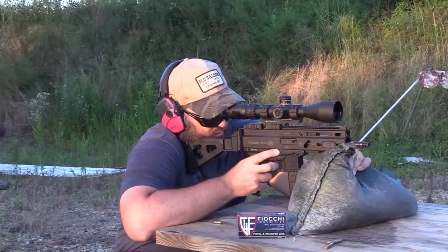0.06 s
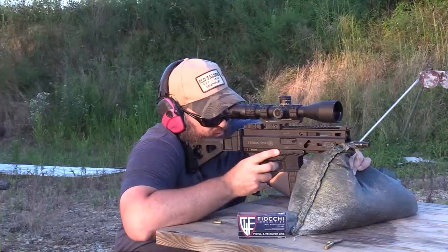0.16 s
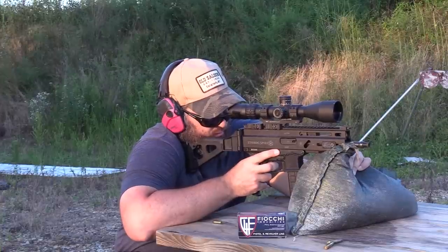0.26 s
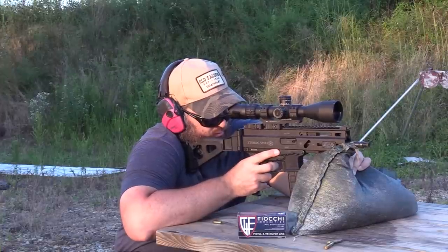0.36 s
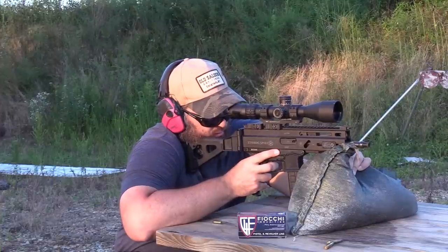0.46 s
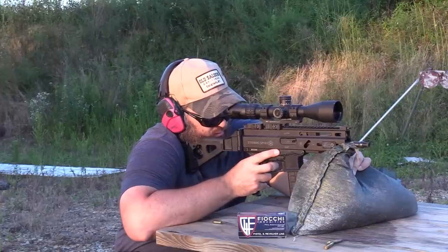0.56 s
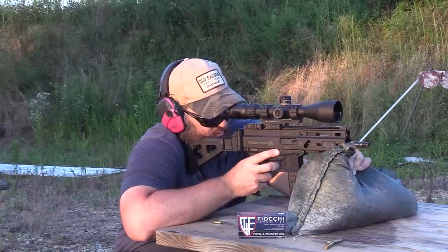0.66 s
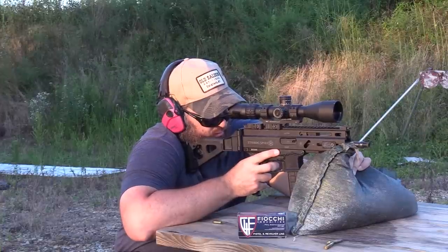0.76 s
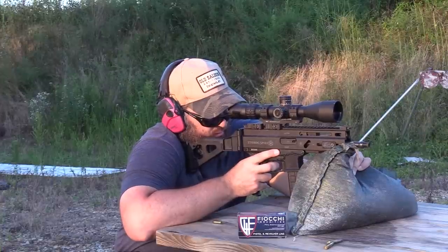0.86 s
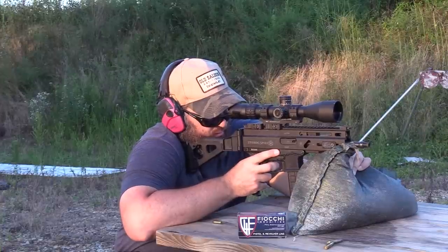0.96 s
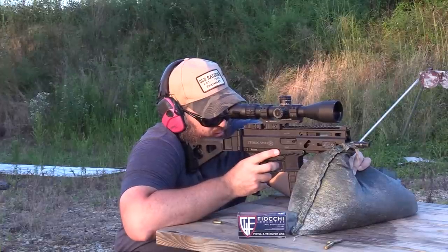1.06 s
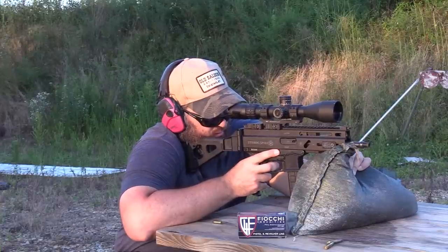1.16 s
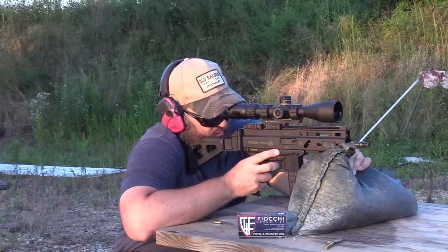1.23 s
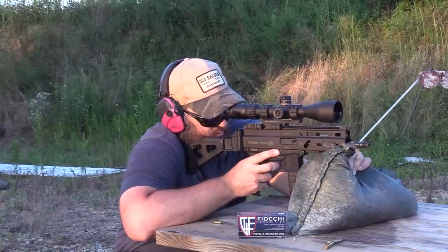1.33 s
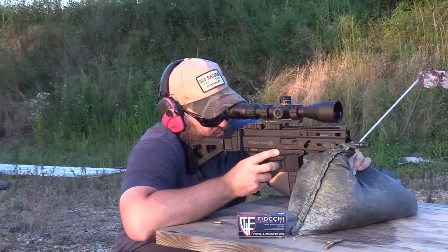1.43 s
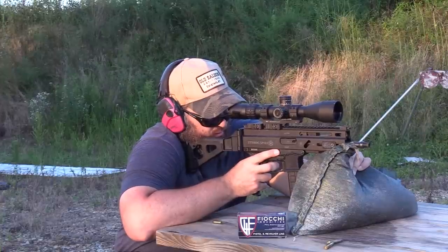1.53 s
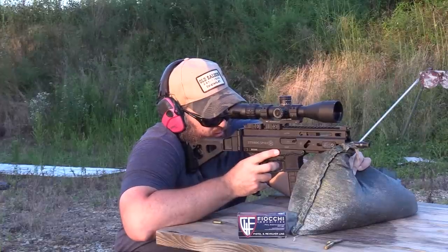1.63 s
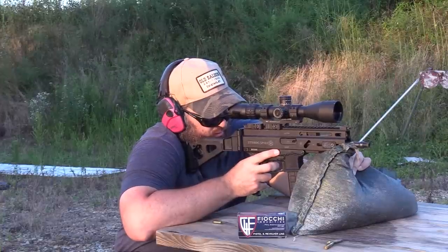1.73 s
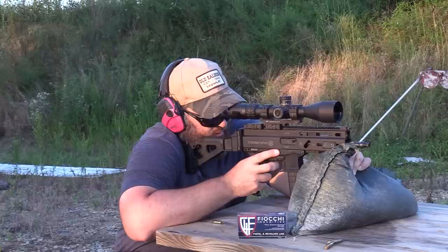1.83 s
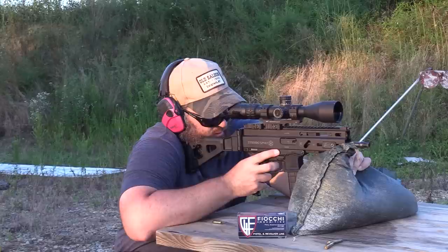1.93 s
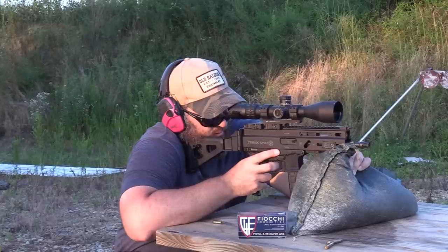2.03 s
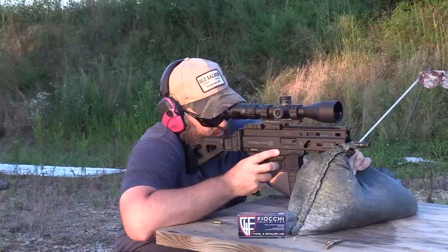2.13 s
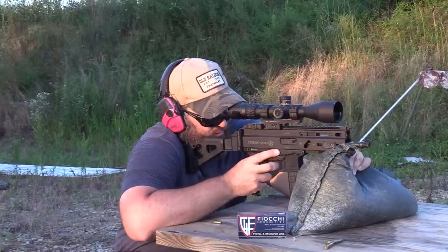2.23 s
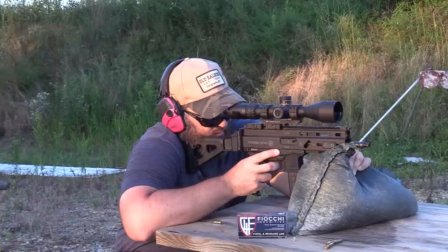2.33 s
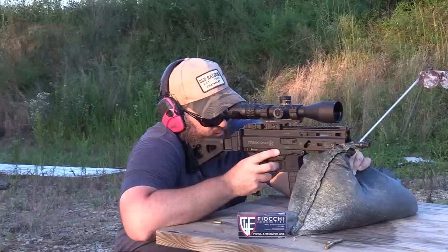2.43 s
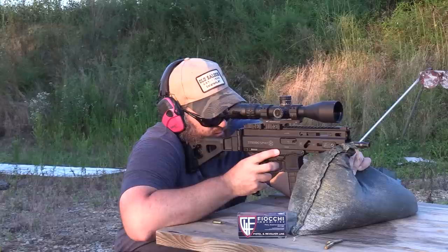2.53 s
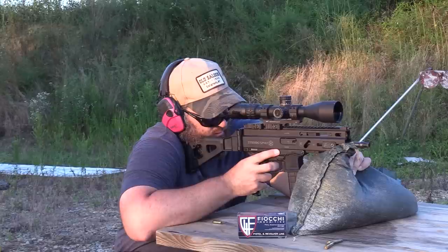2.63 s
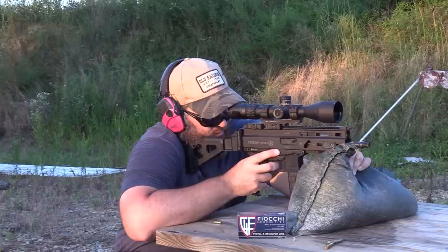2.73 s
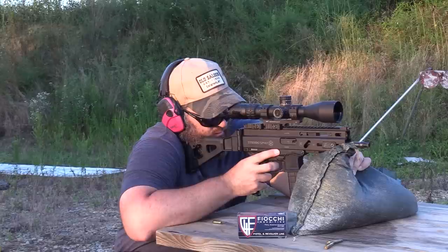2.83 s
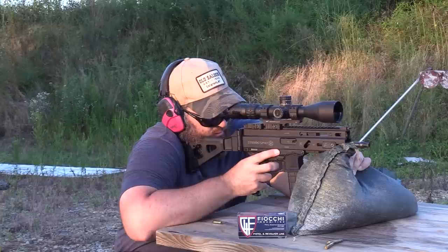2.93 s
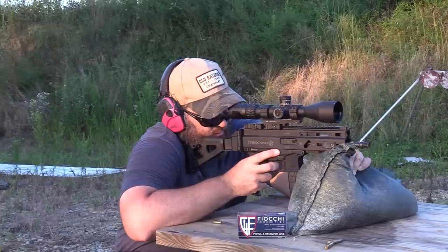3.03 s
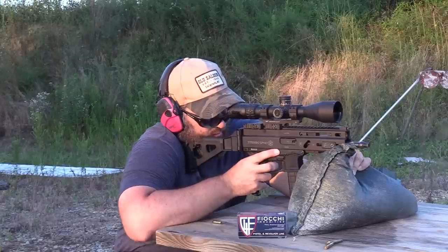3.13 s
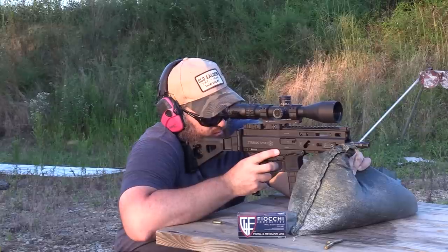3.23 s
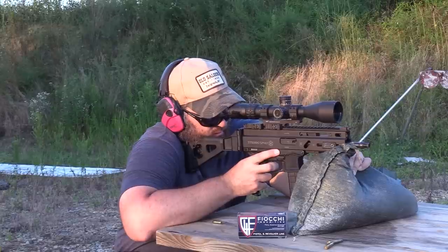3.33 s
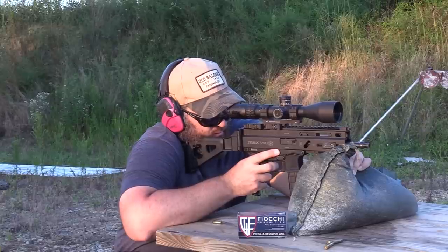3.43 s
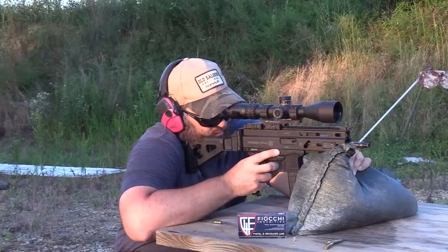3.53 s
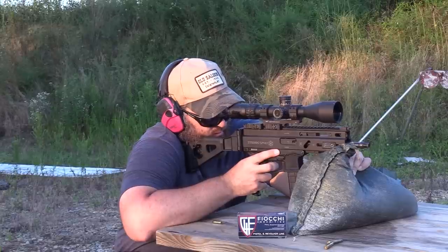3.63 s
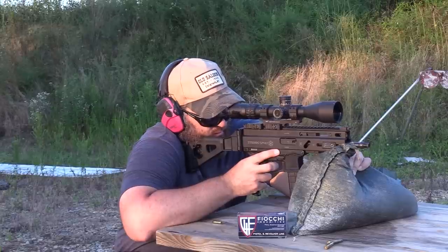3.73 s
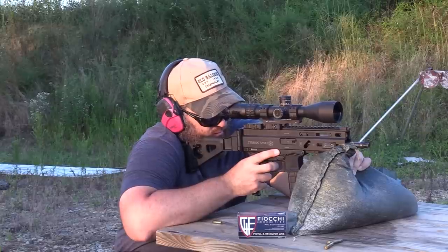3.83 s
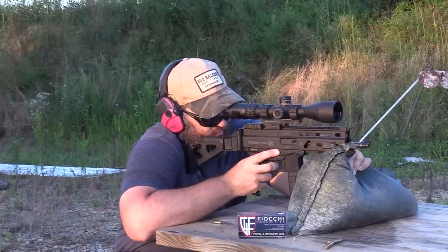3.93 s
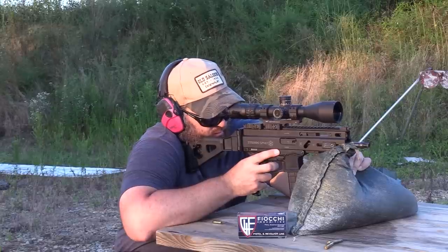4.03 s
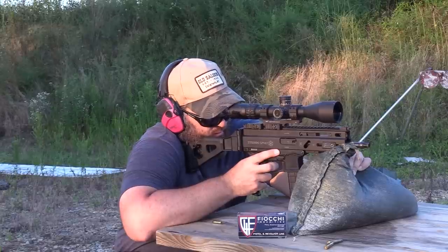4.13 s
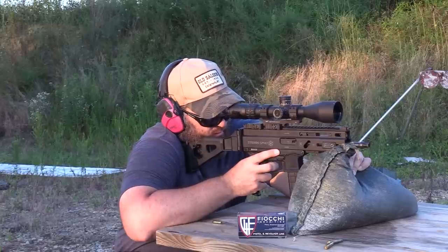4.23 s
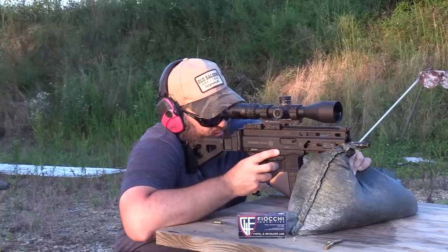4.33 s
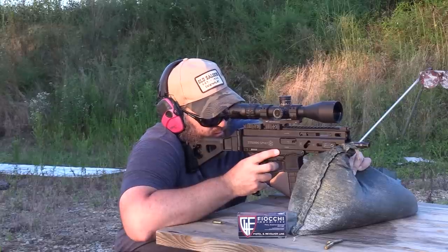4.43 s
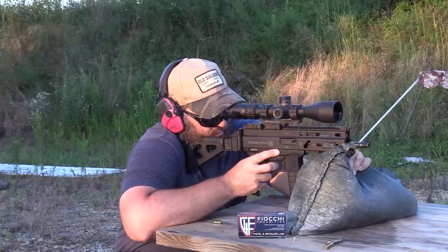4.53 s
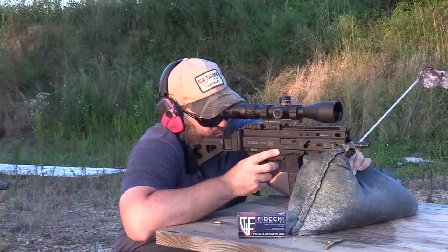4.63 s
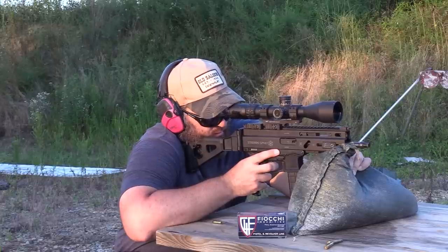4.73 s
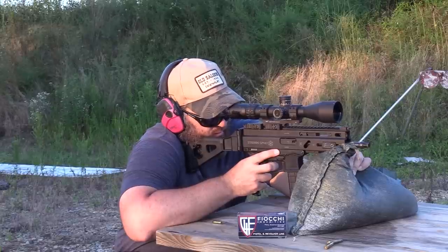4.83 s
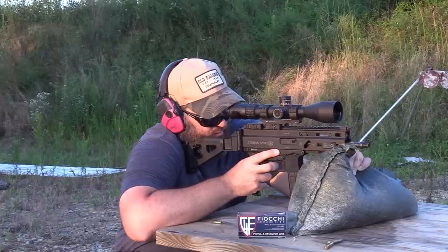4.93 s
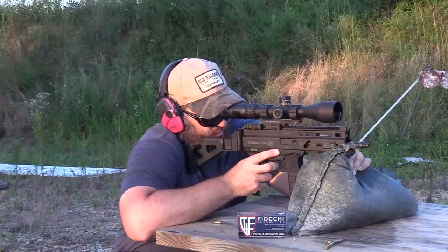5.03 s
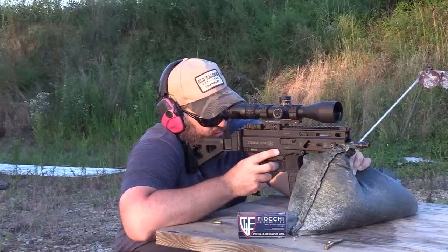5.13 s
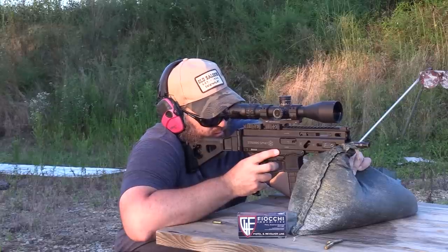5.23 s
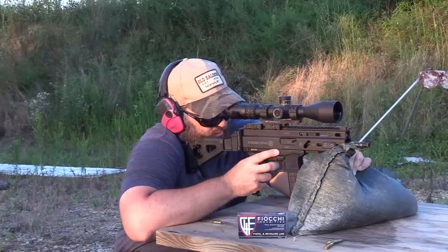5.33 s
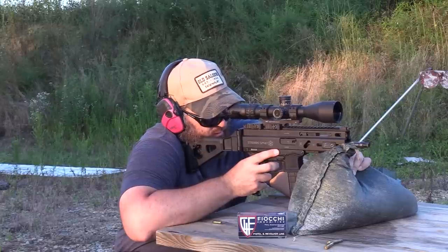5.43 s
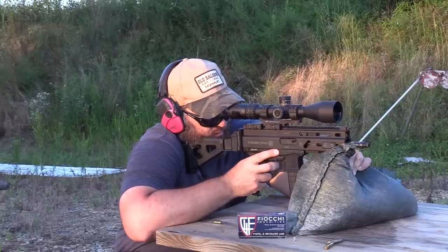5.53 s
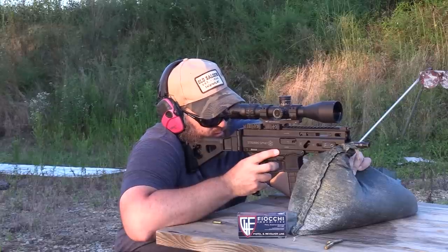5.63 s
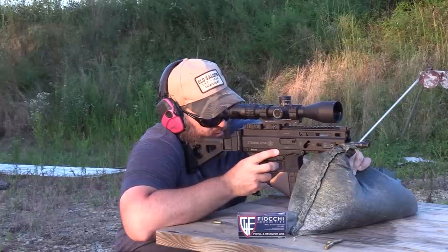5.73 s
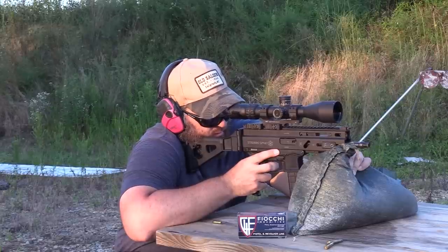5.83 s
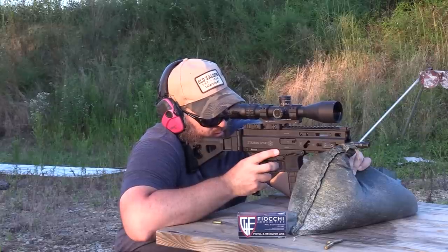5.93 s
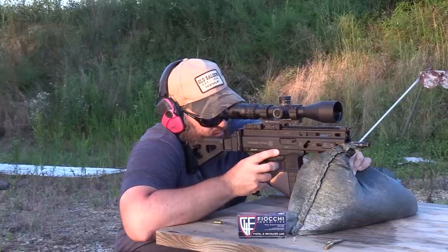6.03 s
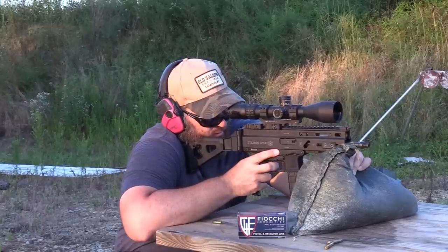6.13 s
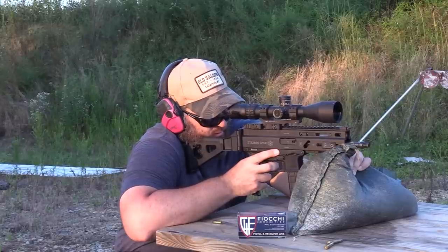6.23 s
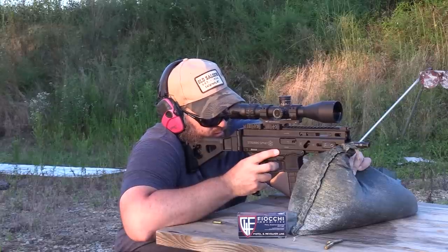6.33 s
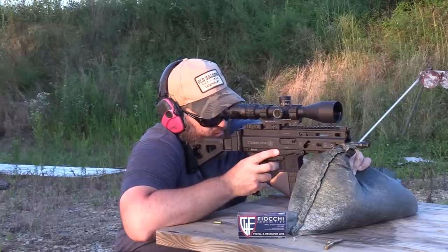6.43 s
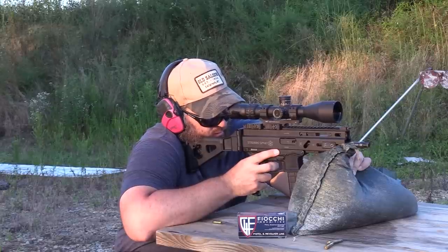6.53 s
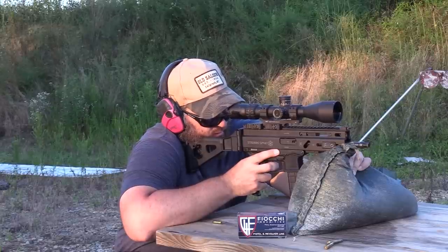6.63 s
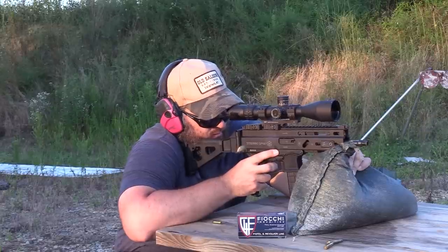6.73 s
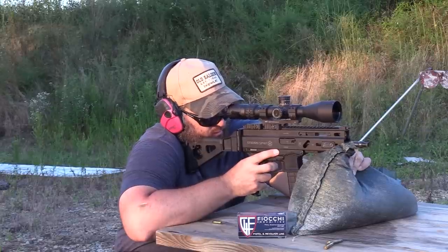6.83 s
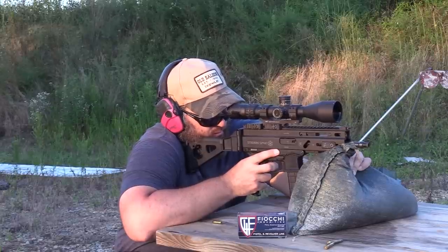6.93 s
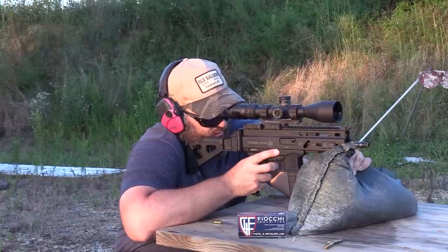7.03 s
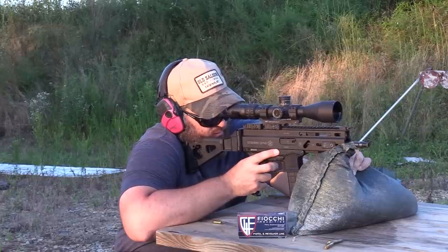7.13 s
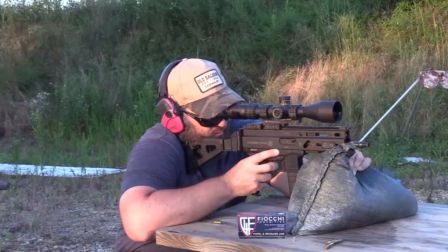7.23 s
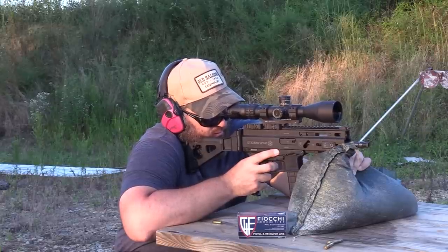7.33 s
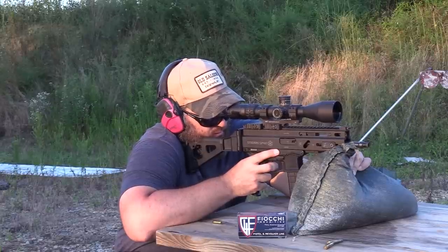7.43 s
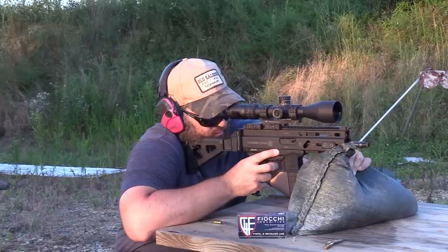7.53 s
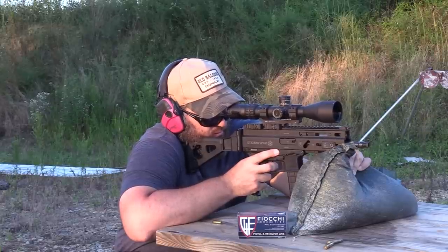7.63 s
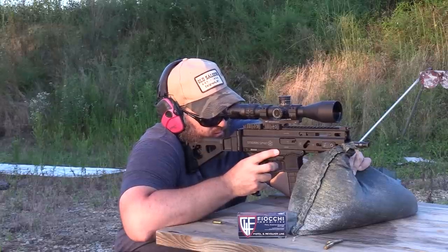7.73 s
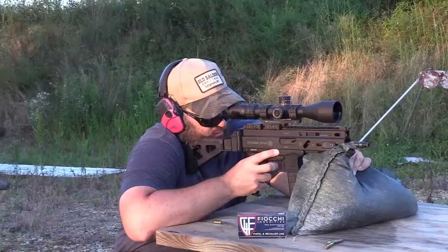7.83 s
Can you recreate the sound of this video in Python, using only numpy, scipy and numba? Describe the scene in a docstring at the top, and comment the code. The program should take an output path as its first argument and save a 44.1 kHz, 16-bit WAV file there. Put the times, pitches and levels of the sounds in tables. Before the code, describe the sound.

Two suppressed rifle shots several seconds apart crack and roll off a hillside, with brass tinkling on a bench amid steady cricket and katydid chorus.

```python
"""Grassy outdoor range at dusk, microphone close to a suppressed rifle firing slow single shots.
Each shot is ragged noise bursts for blast and bolt, short wavelets for slap echoes, and scattered clicks
and noise for the hillside echo; ringing modes make the trigger resets and the brass on the bench.
Crickets, katydids and a far bird are gliding tones over a shaped noise of air and distant chorus.
Overloads pull the recorder's gain down; it holds, then climbs, and the insects swell back."""
import sys
import numpy as np
from scipy import signal
from scipy.fft import rfft, irfft
from scipy.io import wavfile
from scipy.ndimage import uniform_filter1d
from numba import njit

SR = 44100
rng = np.random.default_rng(int(sys.argv[2]) if len(sys.argv) > 2 else 0)


def transcribe(signal):
    """Save signal, clipped to [-1, 1], as a 16-bit WAV file at the path in sys.argv[1]."""
    frames = np.atleast_2d(signal).T
    limited = np.clip(frames, -1, 1)
    pcm = np.round(limited * 32767).astype(np.int16)
    wavfile.write(sys.argv[1], SR, pcm)


N = 347508  # samples
T = np.arange(N) / SR  # s


def undb(db):
    """dB to gain."""
    return 10 ** (np.asarray(db) / 20)


def unit(x):
    """Scale to rms 1."""
    return x / np.sqrt(np.mean(x ** 2))


def band(x, hz, width_hz):
    """Two-pole band-pass, gain 1 at the centre."""
    return signal.lfilter(*signal.iirpeak(hz, hz / width_hz, SR), x)


def walk(rate_hz, size=N):
    """Random levels held 1 / rate_hz seconds and slewed twice; spread near 1."""
    k = int(SR / rate_hz)
    steps = np.repeat(rng.standard_normal(size // k + 1), k)
    return 1.3 * uniform_filter1d(uniform_filter1d(steps, k), k)[:size]


def add(out, sound, start_s):
    """Mix a sound in at start_s; it may start before zero."""
    i = int(round(start_s * SR))
    first, last = max(i, 0), min(i + len(sound), len(out))
    if last > first:
        out[first:last] += sound[first - i:last - i]


def fade(length_s, t60_s):
    """Exponential decay, 60 dB down after t60_s."""
    return np.exp(-np.log(1000) * np.arange(int(length_s * SR)) / SR / t60_s)


def ring(modes):
    """One blow on a set of decaying modes, each with a little chance in level and a random phase."""
    t = np.arange(SR // 2) / SR
    out = np.zeros(len(t))
    for pitch_hz, level_db, t60_s in modes:
        level = undb(level_db + 2 * rng.standard_normal())
        out += level * np.sin(2 * np.pi * (pitch_hz * t + rng.random())) * fade(.5, t60_s)
    return out


# spectrum of the air and far chorus: pitch_hz, level_db (relative density per Hz)
FIELD_SPECTRUM = [(18, -42.5), (30, -11), (95, 1.5), (176, -2), (443, -18), (772, -16.5), (1380, -25.5),
                  (3660, -29), (4650, -7), (5300, -14), (5890, -19.5), (6380, -18), (7880, 0), (8900, -9.5),
                  (9900, -27.5), (15200, -29), (16500, -42.5)]
FIELD_DB = -46


def field():
    """Distant chorus and air: noise shaped in frequency, gently flickering."""
    pitch_hz, level_db = np.transpose(FIELD_SPECTRUM)
    f = np.maximum(np.arange(N // 2 + 1) * SR / N, 1)
    shape = undb(np.interp(np.log(f), np.log(pitch_hz), level_db))
    noise = irfft(rfft(rng.standard_normal(N)) * shape, N)
    return unit(noise * undb(1.0 * walk(6.7))) * undb(FIELD_DB)


# far bird's whistles: start_s, top_hz, level_db
BIRD_WHISTLES = [(5.8, 1770, -62), (6.128, 1830, -61.5)]


def bird():
    """Far bird: short whistles whose pitch and level arch up and down."""
    out, u = np.zeros(N), np.linspace(-1, 1, int(0.036 * SR))
    for start_s, top_hz, level_db in BIRD_WHISTLES:
        tone = np.sin(2 * np.pi * np.cumsum(top_hz - 300 * u ** 2) / SR)
        add(out, undb(level_db) * np.sqrt(1 - u ** 2) * tone, start_s)
    return out


# nearer field crickets: top_hz, level_db, last_chirp_s (list, the last chirp of each phrase)
CRICKET_PHRASES = [(5050, -32.5, [.384, .876, 1.26, 1.61, 2.016, 2.3, 2.71, 3.043, 3.909, 4.271, 4.605, 4.937, 5.311, 5.643, 5.813, 6.138, 6.501, 7.551]),
                   (4680, -37.5, [0.303, 1.09, 2.191, 2.78, 3.785, 4.161, 4.692, 5.242, 6.089, 6.481, 7.577]),
                   (4820, -44, [.49, .63, .991, 1.476, 1.865, 2.58, 2.922, 5.12, 5.501, 5.671, 5.929, 6.259, 6.53, 7.67])]
LAST_GAP_S, RUSH_S = .044, .0065  # gap before the last chirp; each earlier gap is shorter by this
WARM_UP_HZ, WARM_UP_DB = 10, .5  # the k-th chirp before the last is lower and softer by k cubed times these
FAR_CRICKET_HZ, FAR_CRICKET_DB, FAR_PHRASE_S = 4870, -53.5, 0.18  # mean pitch, level and phrase spacing


def crickets():
    """Phrases of four arched chirps that grow louder, higher and slower; far ones sing at random."""
    phrases = [(last_s, top_hz, level_db) for top_hz, level_db, ends_s in CRICKET_PHRASES for last_s in ends_s]
    chance = rng.standard_normal((int(N / SR / FAR_PHRASE_S), 3))
    for k, (late, sharp, loud) in enumerate(chance):
        phrases.append((FAR_PHRASE_S * (k + .4 * late), FAR_CRICKET_HZ + 90 * sharp, FAR_CRICKET_DB + 2.5 * loud))
    out, u = np.zeros(N), np.linspace(0, 1, int(0.03 * SR))
    envelope = np.sin(np.pi * u ** 0.7) ** 1.4
    for last_s, top_hz, level_db in phrases:
        for k in range(4):  # counted back from the last chirp
            pitch_hz = top_hz - WARM_UP_HZ * k ** 3 - 520 * ((u - .34) / 0.5) ** 2
            chirp = envelope * np.sin(2 * np.pi * np.cumsum(pitch_hz) / SR)
            before_s = k * LAST_GAP_S - RUSH_S * k * (k - 1) / 2
            chirp_db = level_db - WARM_UP_DB * k ** 3 + 1.6 * rng.standard_normal()
            add(out, undb(chirp_db) * chirp, last_s - before_s - .014)  # starts about half a chirp early
    return out


def trill(top_hz, drop_hz, pulses_hz, share):
    """Wing strokes: each pulse is a tone that arches up to its top and falls further."""
    cycle = (np.cumsum(pulses_hz * (1 + 0.012 * walk(2.2))) / SR + rng.random()) % 1
    u = np.minimum(cycle / share, 1)  # silent once it reaches 1
    pitch_hz = top_hz - drop_hz * ((u - .3) / 0.56) ** 2 + 45 * walk(40)
    envelope = np.sin(np.pi * u) * undb(1.3 * walk(30))
    return unit(envelope * np.sin(2 * np.pi * np.cumsum(pitch_hz) / SR))


# steady trills: top_hz, drop_hz (scale of the fall), pulses_hz, share (sounding part of a pulse), level_db
STEADY_TRILLS = [(5927, 480, 74, .75, -57), (7920, 380, 15.6, 0.38, -51), (7120, 800, 55, 0.42, -57.5),
                 (8600, 450, 60, 0.93, -55.5), (7820, 870, 58, 0.55, -56.5)]
# course of the nearest katydid: time_s, top_hz, level_db
NEAR_KATYDID = [(0, 9340, -53.5), (3.1, 9400, -51), (4.2, 9100, -54), (4.95, 8920, -60), (4.999, 8660, -85),
                (7.88, 8900, -70)]
BUZZ_FROM_S, BUZZ_EVERY_S, BUZZ_S, BUZZ_DB = 4.53, .3635, .06, -55  # short high buzz, repeated


def insects():
    """Trills at several distances, near katydid, short buzz and crickets, smeared by the grass."""
    time_s, top_hz, level_db = np.transpose(NEAR_KATYDID)
    katydid = trill(np.interp(T, time_s, top_hz), 1200, 58.8, 1.0) * undb(np.interp(T, time_s, level_db))
    out = katydid + crickets()
    for top_hz, drop_hz, pulses_hz, share, level_db in STEADY_TRILLS:
        out = out + trill(top_hz, drop_hz, pulses_hz, share) * undb(level_db + 0.67 * walk(8.8))
    gate = (T > BUZZ_FROM_S) * ((T - BUZZ_FROM_S) % BUZZ_EVERY_S < BUZZ_S)
    out = out + undb(BUZZ_DB) * gate * trill(9080, 250, 108.0, 1.0)
    grass = rng.standard_normal(SR // 5) * fade(.2, .15)
    smear = signal.fftconvolve(out, grass / np.linalg.norm(grass))[:N]
    return out + undb(-15) * smear


# spent cases landing on the bench: start_s, tick_db, ring_db
BRASS_BOUNCES = [(.077, -38, -48), (.294, -30, -43), (.532, -50, -48), (3.707, -28, -36.5),
                 (3.763, -37, -44), (4.023, -33, -36.5), (4.141, -40, -36), (4.406, -39, -51),
                 (4.6, -62.5, -60), (7.186, -13, -25), (7.408, -25, -23.5), (7.425, -28, -48),
                 (7.547, -23, -35), (7.676, -34, -29), (7.765, -50, -54)]
# modes of a case: multiple (of the main ring), level_db, t60_s
CASE_MODES = [(1, 0, 0.19), (.997, -7, 0.18), (1.008, -15, .08), (.47, 4.5, 0.015)]
# main ring of each shot's case: pitch_hz
CASE_RINGS = [10480, 10480, 10660]
# shots: start_s, level_db
RIFLE_SHOTS = [(-.407, 2), (3.128, 2.5), (6.729, 2)]


def brass():
    """Spent cases bouncing: each contact is a noise tick and a ring of the latest shot's case."""
    out = np.zeros(N)
    shots_s = np.transpose(RIFLE_SHOTS)[0]
    for start_s, tick_db, ring_db in BRASS_BOUNCES:
        case_hz = CASE_RINGS[np.searchsorted(shots_s, start_s) - 1]
        modes = [(multiple * case_hz, level_db, t60_s) for multiple, level_db, t60_s in CASE_MODES]
        tick = unit(band(rng.standard_normal(SR // 2), 6300, 4000)) * fade(.5, 0.023)
        add(out, undb(tick_db) * tick + undb(ring_db) * ring(modes), start_s)
    return out


# trigger resets: start_s, level_db
TRIGGER_RESETS = [(.709, -2.5), (5.388, -2.5)]
# modes struck by a reset: pitch_hz, level_db, t60_s
TRIGGER_MODES = [(1055, -9.5, 0.063), (923, -20.5, 0.12), (814, -8, 0.024), (1170, -14, 0.027),
                 (1630, -10, 0.045), (2260, -15, 0.0057), (3000, -4, 0.0077), (3620, 0, 0.01),
                 (4880, 2, 0.0082), (9360, 1, 0.0033)]


def trigger_resets():
    """The sear slides, then seats: a snap of noise and a ring of modes with a brief rise."""
    out = np.zeros(N)
    seat = np.minimum(np.arange(SR // 2) / SR / 0.0013, 1)
    for start_s, level_db in TRIGGER_RESETS:
        snap = unit(band(band(rng.standard_normal(SR // 2), 2440, 3200), 1850, 4100))
        snap = snap * (fade(.5, 0.012) + 0.055 * fade(.5, 0.073))
        add(out, undb(level_db) * seat * (0.66 * ring(TRIGGER_MODES) + 1.0 * snap), start_s - .0005)
    return out


# berms and hillsides that scatter the shot back:
# delay_s, level_db, bass_db (above level), treble_db (above level), fade_db_s (dB per second)
HILLSIDES = [(.1, -41, 27, 10, 900), (.16, -38.5, 1.5, -3, 196), (.205, -41.5, 5, 14.5, 34),
             (.262, -38.5, -12.5, 16.5, 86), (0.433, -30.5, -2, -3.5, 14.5), (1.089, -36.5, -18, -14, 69),
             (1.172, -28.5, -18.5, -23, 113), (1.2, -39.5, -12.5, -13, 15.5)]
SWELL_S, BASS_FADE, AIR_DB_S = 0.0024, 0.73, 9.5  # rise of a return; the bass fades slower; air eats the treble


def returns(t):
    """Bass, middle and treble echo levels: each slope swells in and fades, powers add."""
    power = np.zeros((3, len(t)))
    for delay_s, level_db, bass_db, treble_db, fade_db_s in HILLSIDES:
        late_s = np.maximum(t - delay_s, 0)
        levels_db = [level_db + bass_db - BASS_FADE * fade_db_s * late_s,
                     level_db - fade_db_s * late_s,
                     level_db + treble_db - (fade_db_s + AIR_DB_S) * late_s]
        swell = np.clip(1 + (t - delay_s) / SWELL_S, 0, 1)
        power += (undb(levels_db) * swell) ** 2
    return np.sqrt(power)


# bands of the hillside echo, deep roll first: low_edge_hz, high_edge_hz
ECHO_BANDS = [(70, 200), (250, 477), (680, 1378), (1550, 4420)]
RUMBLE_DB = -15  # deep roll relative to the low echo


def hillside_echo(size):
    """Rolling echo: trunks and stones each return a small click, foliage returns noise."""
    low, middle, high = returns(np.arange(size) / SR)
    clicks = (rng.random(size) < 500 / SR) * rng.standard_normal(size)  # about 500 a second
    clicks = clicks * undb(1.8 * np.minimum(rng.exponential(size=size), 2))
    foliage = rng.standard_normal(size) * undb(1.6 * walk(80, size=size))
    scatter = 0.64 * unit(clicks) + foliage
    echo = np.zeros(size)
    levels = [low * undb(RUMBLE_DB), low, middle, high]
    for k, (edges_hz, level) in enumerate(zip(ECHO_BANDS, levels)):
        part = signal.sosfilt(signal.butter(2, edges_hz, "band", fs=SR, output="sos"), scatter)
        part = unit(part * undb(2.2 * walk(60, size=size)))
        echo += (-1) ** k * part * level  # alternate signs let neighbours meet in phase
    return echo


# blast, bolt and the near berm's ring: delay_s, centre_hz, width_hz, level_db, t60_s
BLAST_BURSTS = [(0, 2987, 3000, -3.5, 0.034), (.004, 2255, 900, 15, 0.012), (.004, 7120, 9000, -15, 0.11),
                (.007, 1006, 496, 4, 0.2), (.001, 1094, 499, 1, .02), (.007, 567, 400.4, 10, 0.17),
                (.008, 254, 250, 6.5, 0.21), (.01, 2180, 2000, -1, 0.32), (.008, 139, 85.1, -6, .3),
                (0.039, 2800, 4050, 0.5, 0.019), (.061, 4000, 1950, 5, 0.039),
                (0.262, 1500, 600, -20, 0.44)]


def blast(size):
    """Gas jet, can thump, bolt and near berm as ragged bursts of band noise that decay."""
    out = np.zeros(size)
    for delay_s, centre_hz, width_hz, level_db, t60_s in BLAST_BURSTS:
        noise = band(rng.standard_normal(SR // 2), centre_hz, width_hz)
        ragged = unit(noise * undb(4.0 * walk(300, size=SR // 2)))
        add(out, undb(level_db) * ragged * fade(.5, t60_s), delay_s)
    return out


# hard single echoes of the crack: delay_s, centre_hz, level_db
SLAP_ECHOES = [(.1, 1706, 14), (0.2044, 4100, -3.5), (.213, 2960, -7), (0.232, 2500, 4), (.2545, 1950, 11),
               (.2615, 1500, 1), (.305, 1400, -18.5), (.315, 1700, -1), (.432, 860, -16.5),
               (1.086, 854, -21.5), (1.171, 820, -13), (1.194, 1050, -17)]


def slaps(size):
    """Each slap is a crack of little more than one cycle, again via the ground, and a short smear."""
    out = np.zeros(size)
    t = np.arange(-100, 100) / SR
    for delay_s, centre_hz, level_db in SLAP_ECHOES:
        crack = np.sin(2 * np.pi * centre_hz * t + np.pi / 4) * np.exp(-(centre_hz * t / 0.23) ** 2 / 2)
        crack = signal.lfilter(*signal.butter(2, 0.96 * centre_hz, "high", fs=SR), crack)
        smear = unit(band(rng.standard_normal(SR // 10), centre_hz, centre_hz)) * fade(.1, .025)
        add(out, undb(level_db) * crack, delay_s + t[0])
        add(out, .9 * undb(level_db) * crack, delay_s + t[0] + .00023)  # ground path
        add(out, undb(level_db - 22) * smear, delay_s)
    return out


# where the faded echo of each shot but the last stops abruptly: time_s
ECHO_STOPS = [2.09, 5.69]


def rifle():
    """Shots with their slaps and hillside echoes, the trigger resets and the brass."""
    out = trigger_resets() + brass()
    size = 3 * SR
    for (start_s, level_db), stop_s in zip(RIFLE_SHOTS, ECHO_STOPS + [np.inf]):
        near = blast(size) + slaps(size)
        echo = hillside_echo(size) * (start_s + np.arange(size) / SR < stop_s)
        add(out, undb(level_db) * (near + echo), start_s)
    return out


def scene():
    """All sources at the microphone."""
    return (field() + bird() + insects() + rifle())[None]


@njit
def gain_control(x, cut, attack, hold, release, held):
    """Gain in dB: an overload pulls it down, it holds, then climbs at a steady rate."""
    out, db = np.empty(len(x)), -cut
    for i in range(len(x)):
        if abs(x[i]) > 2.2 and held <= 0:
            held = hold
        held -= 1
        db = db - (db + cut) * attack if held > 0 else min(db + release, 0.)
        out[i] = db
    return out


GAIN_CUT_DB, ATTACK_S, HOLD_S, RELEASE_DB_S = 16.5, 0.024, 0.72, 30  # hold includes the attack
TOP_HZ = 16000  # top of the recorder's range


def record(dry):
    """Gain control around an input that overloads; a coupling capacitor tilts the flat tops."""
    held = (HOLD_S + RIFLE_SHOTS[0][0]) * SR  # still down from the shot just before the start
    db = gain_control(dry[0], 1. * GAIN_CUT_DB, 1 / (ATTACK_S * SR), HOLD_S * SR, RELEASE_DB_S / SR, held)
    after = 0.31  # share of the cut that follows the overload stage
    clipped = 0.7 * np.tanh(dry * undb((1 - after) * db) / 0.77)
    tilted = signal.lfilter(*signal.butter(1, 200, "high", fs=SR), clipped) * undb(after * db)
    return signal.sosfilt(signal.ellip(8, .2, 90, TOP_HZ, fs=SR, output="sos"), tilted)


dry = scene()
out = record(dry)
transcribe(out)
```